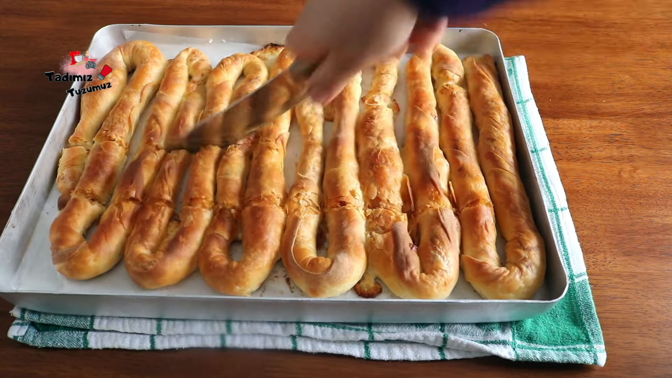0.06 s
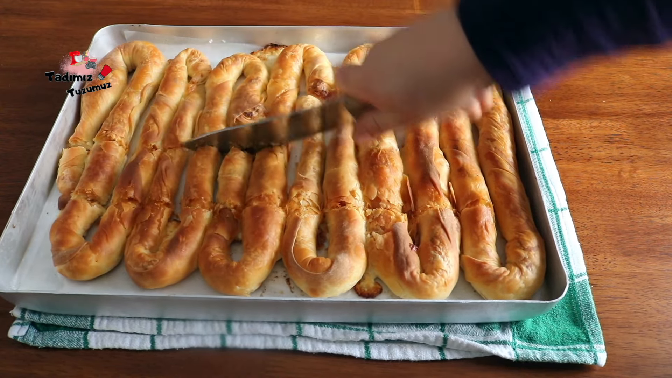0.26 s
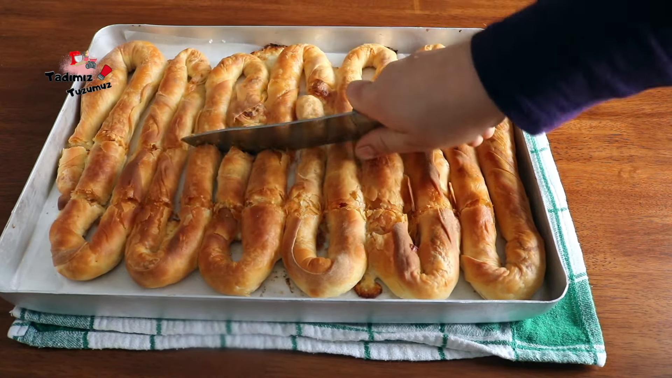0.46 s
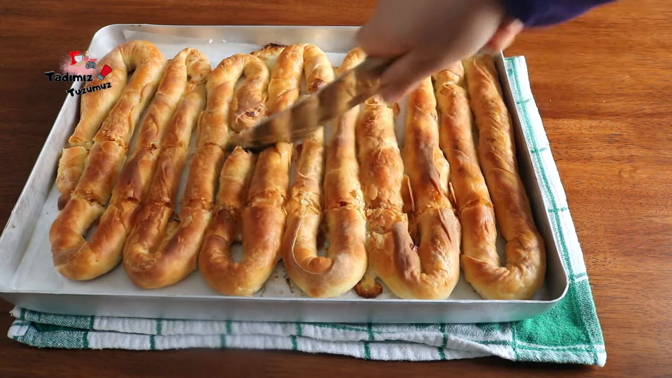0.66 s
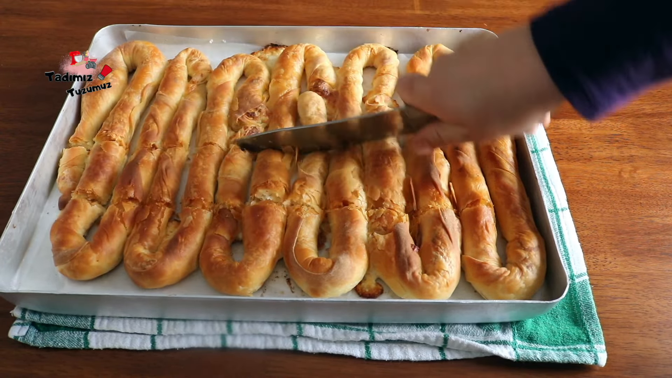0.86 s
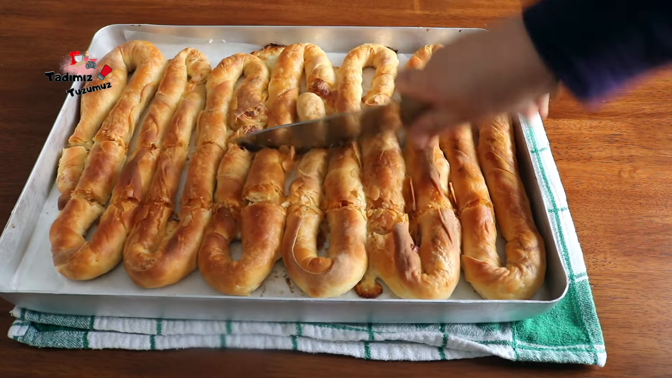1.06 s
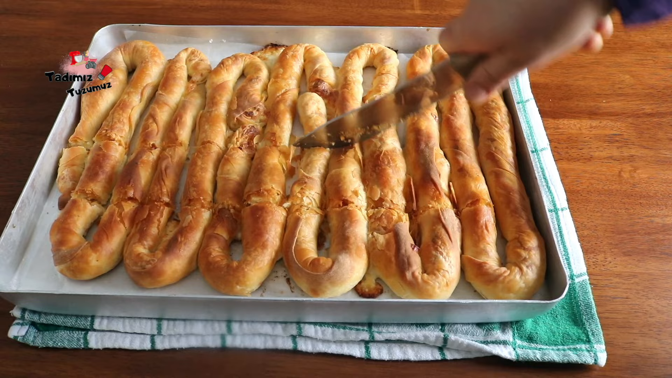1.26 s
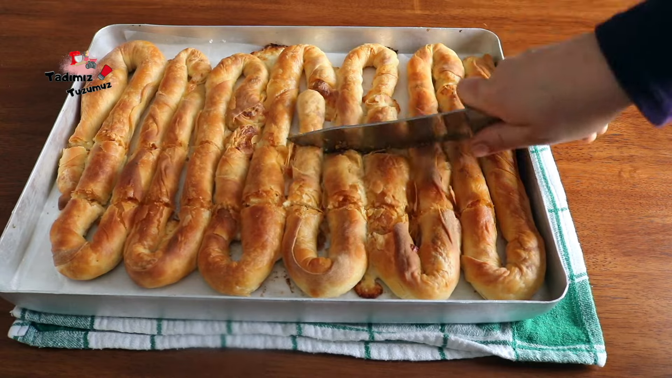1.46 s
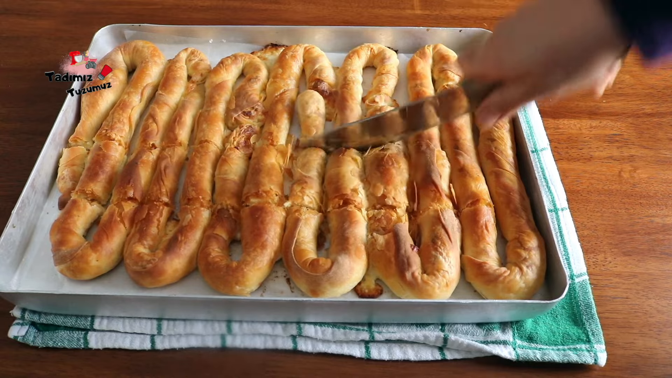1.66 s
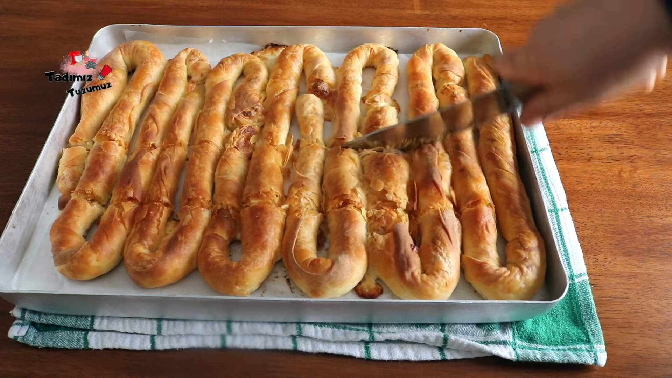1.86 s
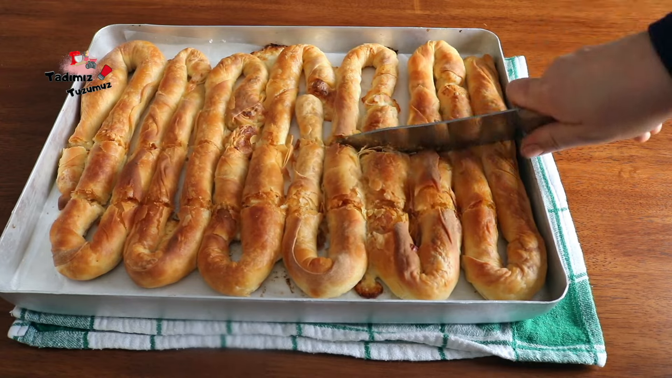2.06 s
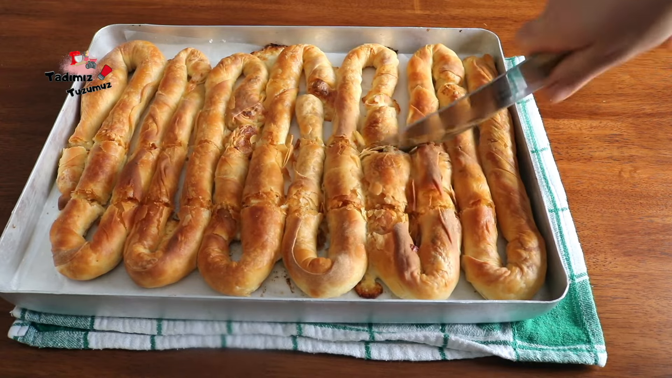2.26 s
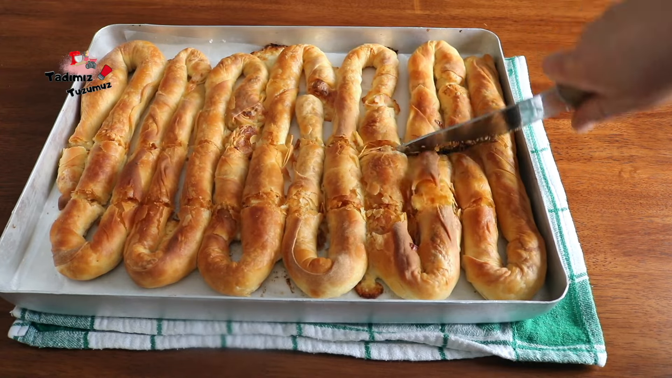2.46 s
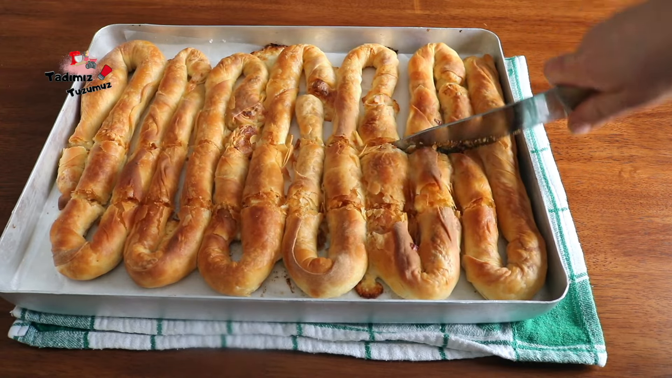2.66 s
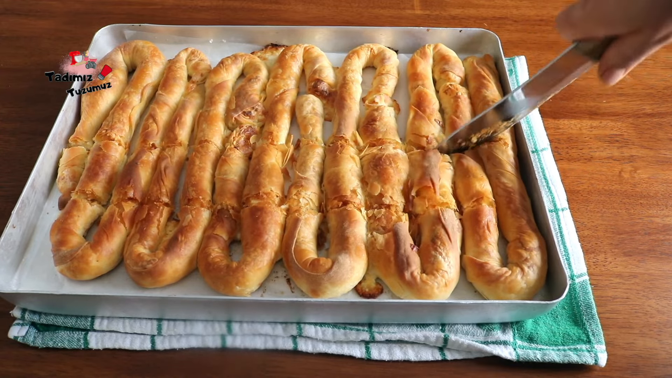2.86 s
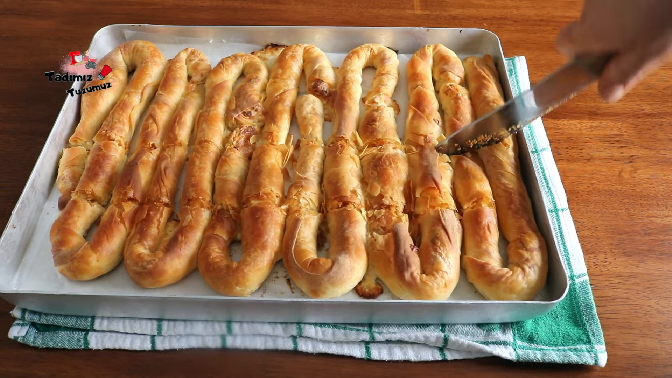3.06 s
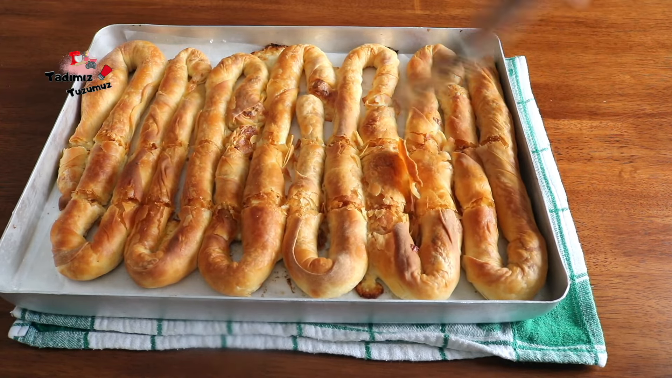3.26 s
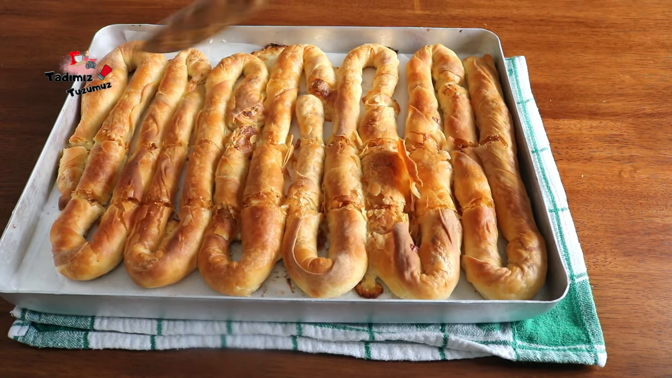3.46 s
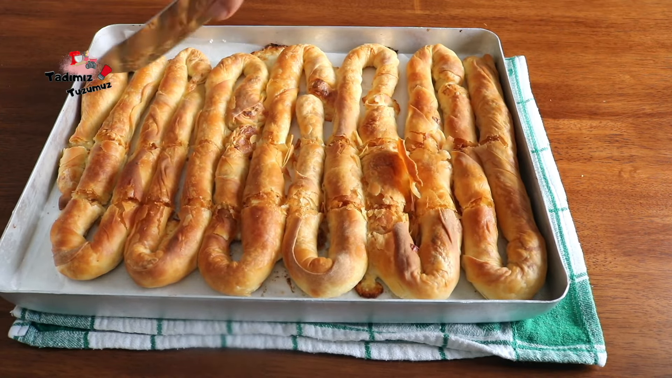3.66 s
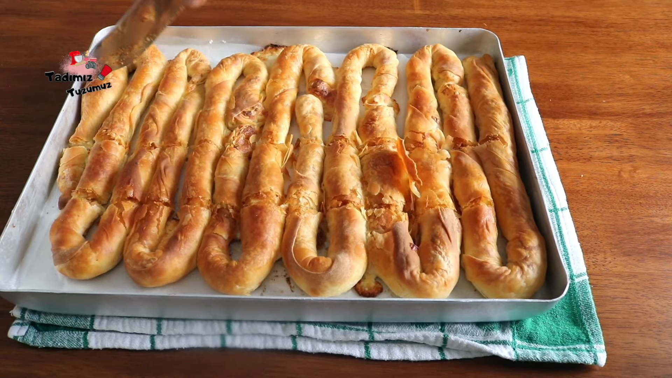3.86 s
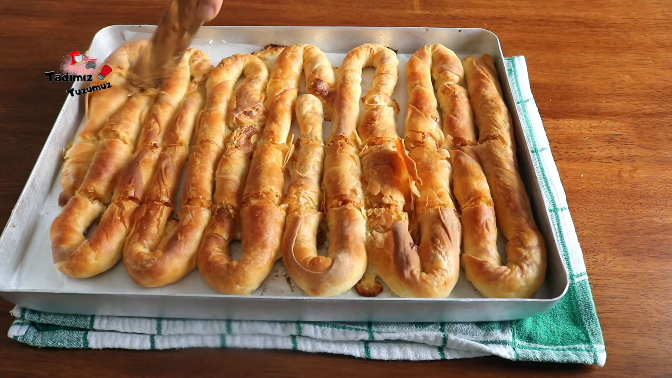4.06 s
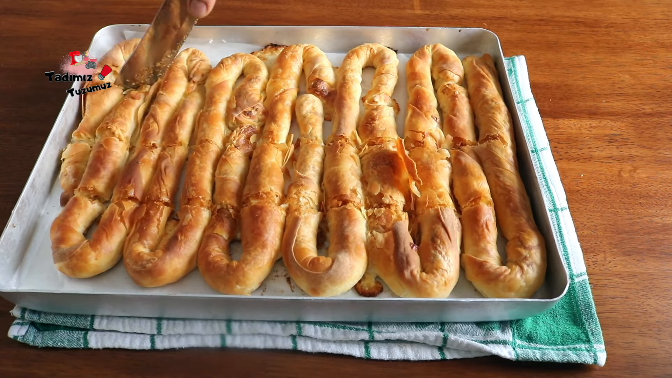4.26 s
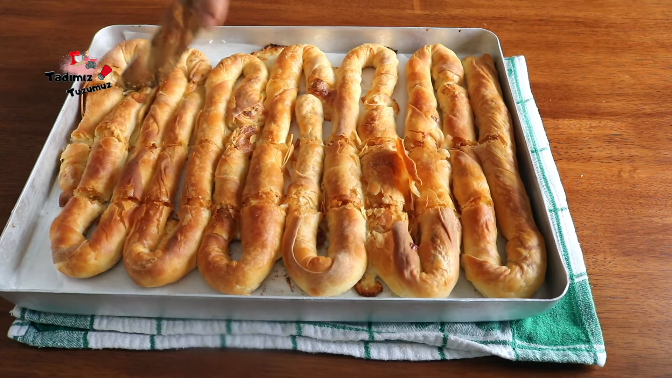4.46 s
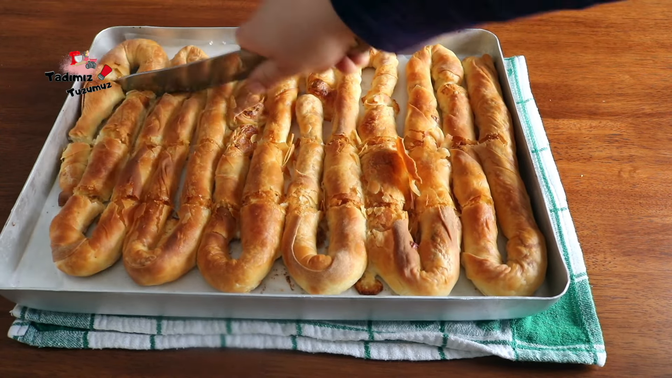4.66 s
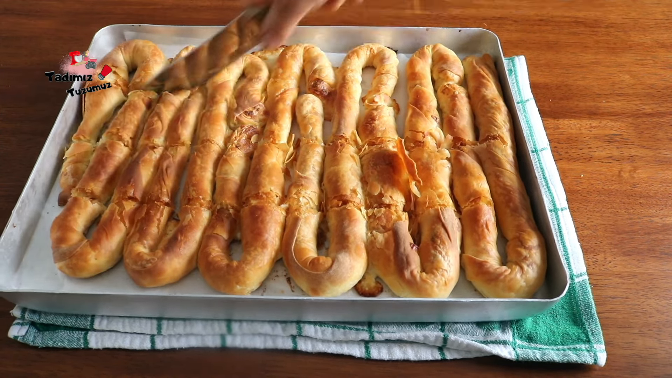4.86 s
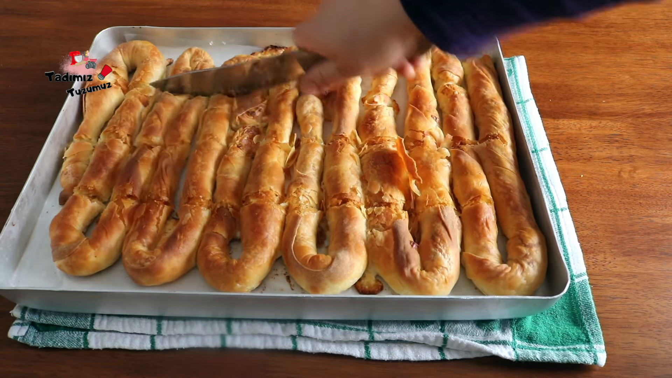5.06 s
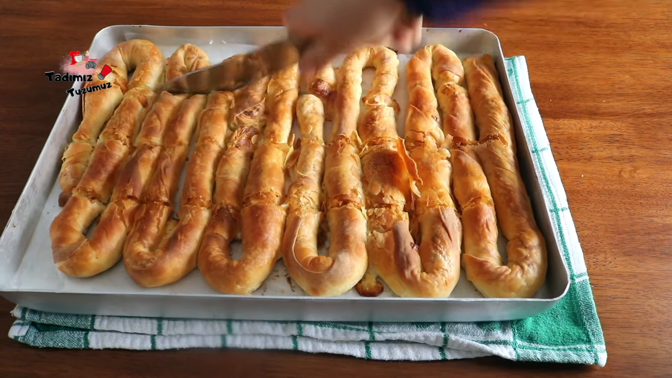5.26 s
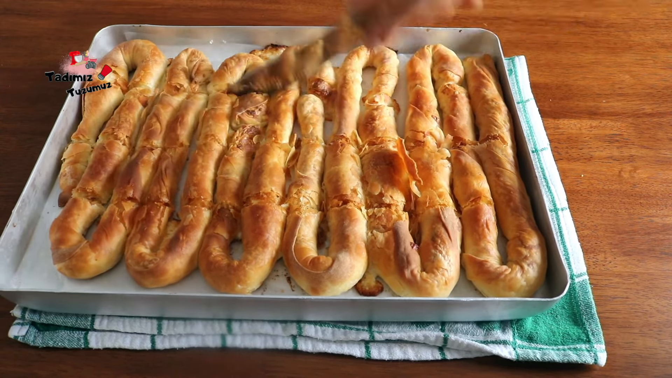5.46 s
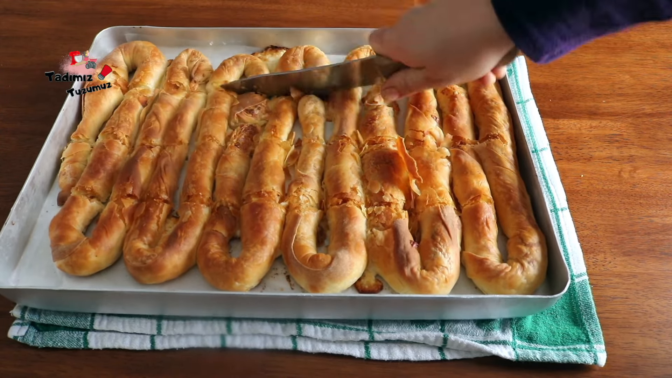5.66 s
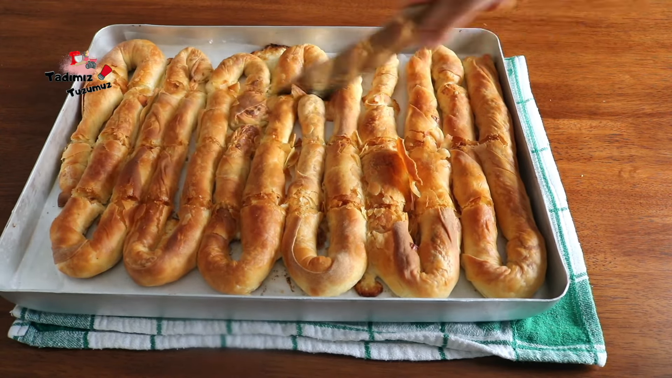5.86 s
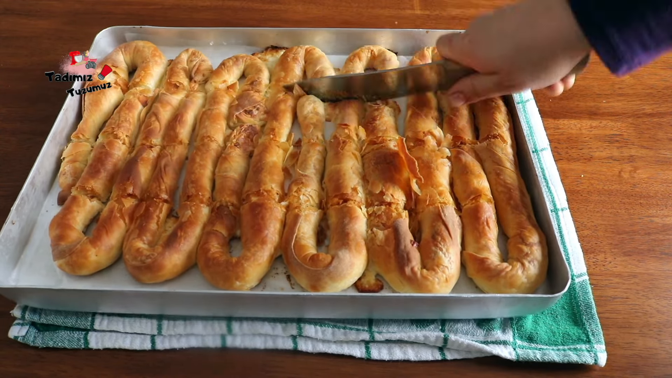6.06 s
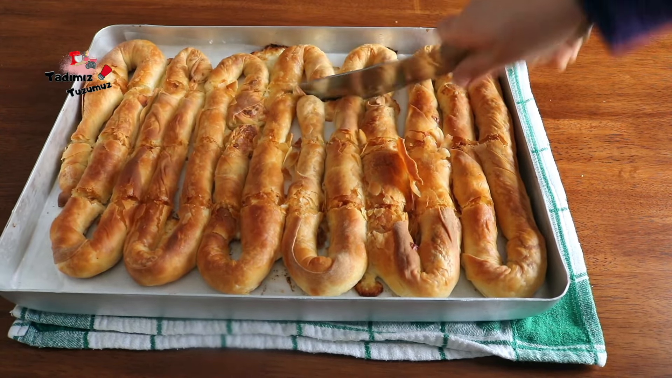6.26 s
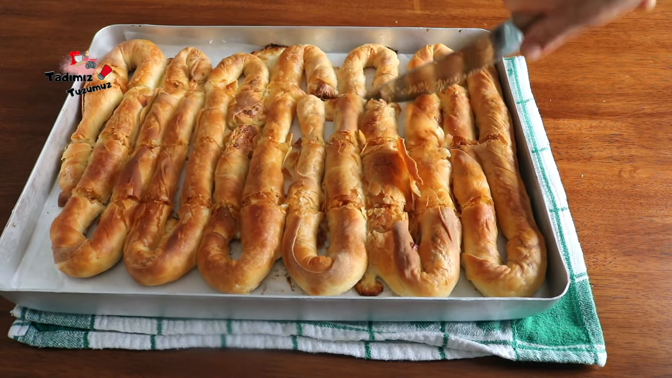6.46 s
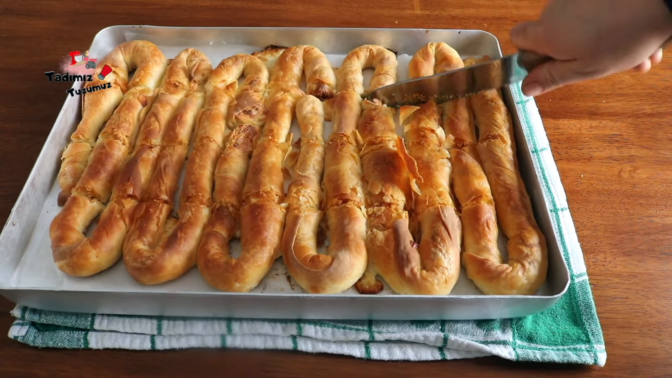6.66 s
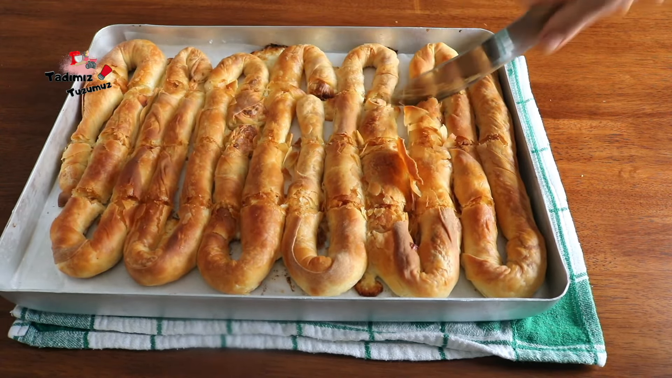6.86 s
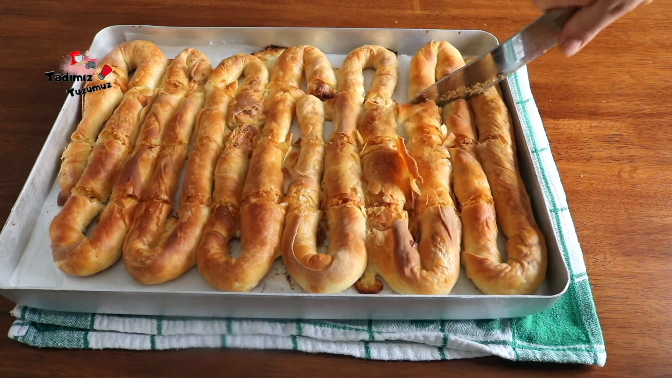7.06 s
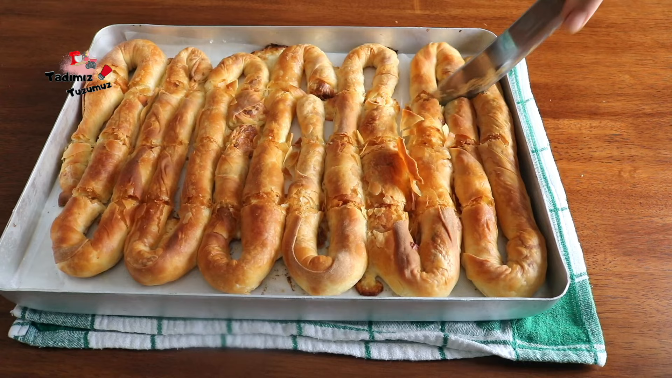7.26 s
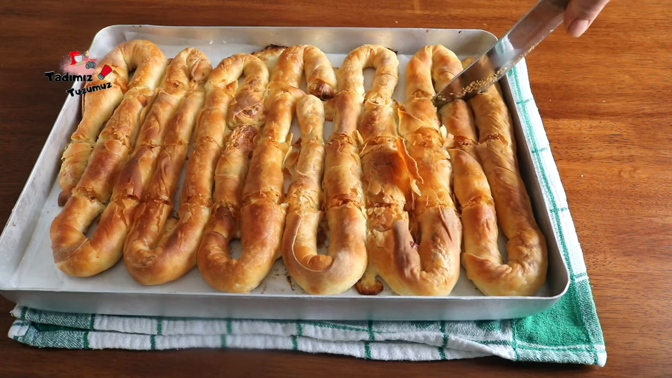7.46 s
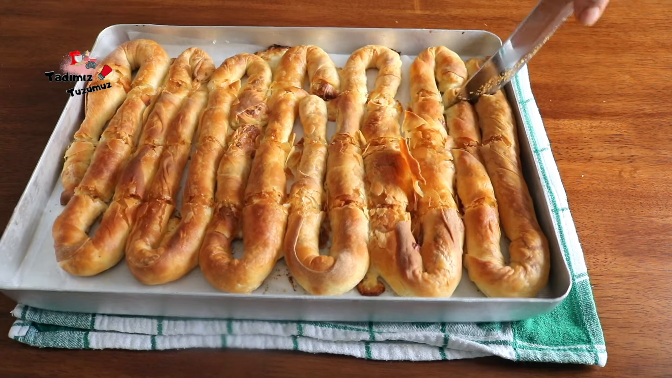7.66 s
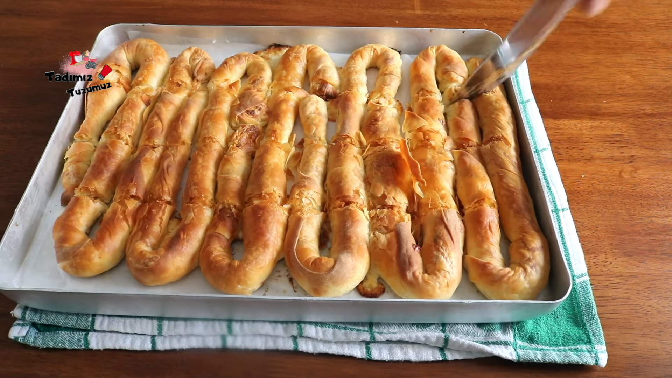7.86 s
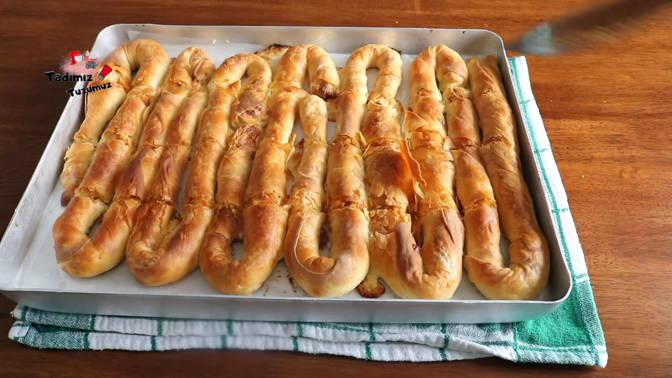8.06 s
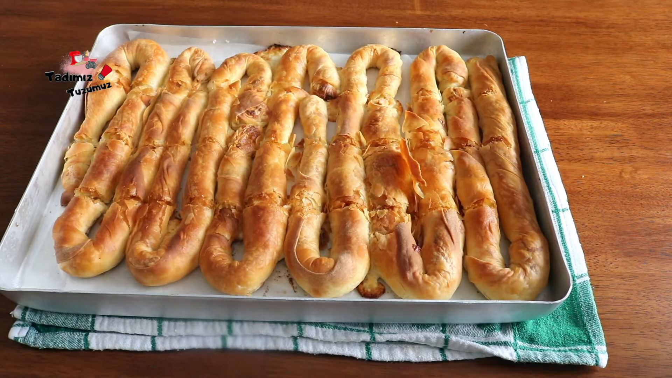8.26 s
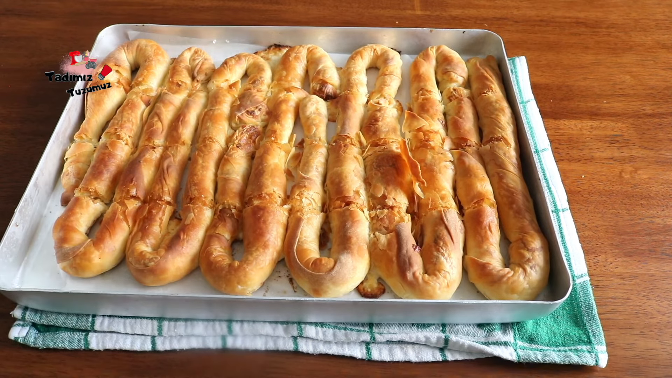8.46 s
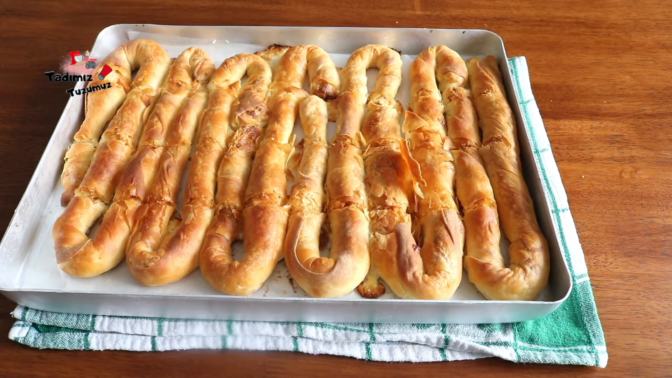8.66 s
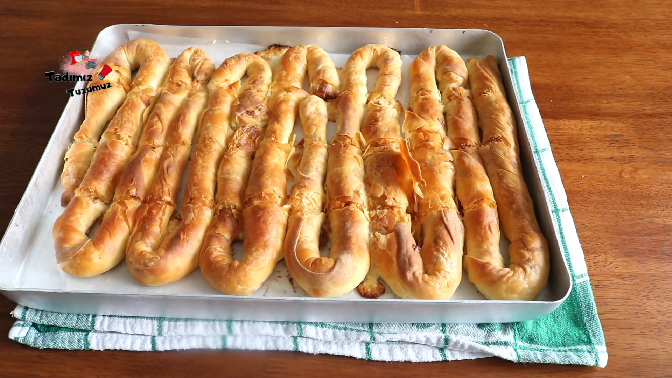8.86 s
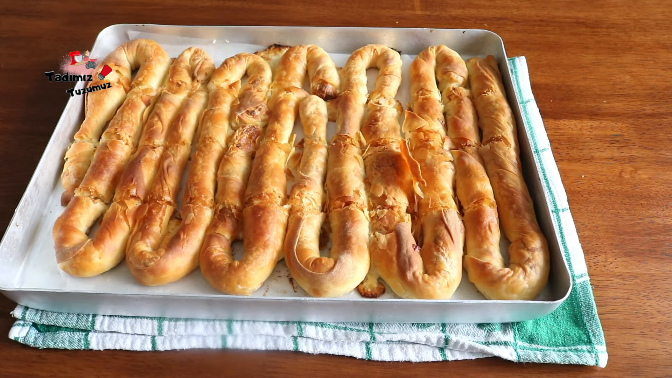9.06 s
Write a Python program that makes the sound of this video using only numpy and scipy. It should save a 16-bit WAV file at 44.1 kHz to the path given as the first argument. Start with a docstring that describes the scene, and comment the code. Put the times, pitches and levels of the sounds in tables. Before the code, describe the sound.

A knife cuts crisp pastry on a metal tray resting on a towel, heard very close in a small kitchen with short, bright reverberation. From 0 to 0.8 s there are light crackles, rustling and a rubbing scrape. Stronger crunches and sharp snaps begin near 0.85 s and cluster around 1.35-1.5, 1.9-2.1, 2.4 and 2.9 s, joined by dull, briefly ringing tray knocks. From about 3.2 s it thins to faint scrapes and a small tap. The second pass bites in at 4.0 s, squeaks clearly around 4.65 s, then crackles in dense irregular bursts at 5.0-5.2, 5.5, 5.9-6.2 and 6.5 s. A hard tray knock lands near 7.1 s, followed by short scrapes, ticks and knocks until 7.9 s. A weak last touch around 8.2 s leaves only quiet room hush.

```python
"""In a small kitchen a knife saws twice across a metal tray of crisp baked pastry, close to the microphone.
Brittle fracture: each bite crushes a swarm of tiny flakes as decaying clicks, with a few loud snaps.
Friction: slips of the blade excite short resonances as squeaks, and its flat hisses along the cut.
Impact: the blade knocks through to the tray, which rests on a towel and rings in damped modes.
Dense decaying noise reflections form the reverberation, over faint steady room noise."""
import sys
import numpy as np
from scipy import signal
from scipy.fft import rfft, irfft, next_fast_len
from scipy.io import wavfile
from scipy.ndimage import uniform_filter1d

SR = 44100
rng = np.random.default_rng(int(sys.argv[2]) if len(sys.argv) > 2 else 0)


def bounce(signal):
    """Save signal as a 16-bit WAV file at the path given by the first command-line argument."""
    frames = np.transpose(np.atleast_2d(signal))
    limited = np.clip(frames, -1, 1)
    pcm = np.round(limited * 32767).astype(np.int16)
    wavfile.write(sys.argv[1], SR, pcm)


N = 401310  # samples


def gain_of(db):
    """Logarithmic level: converts decibels to amplitude."""
    return 10 ** (np.asarray(db) / 20)


def evened(x):
    """Normalisation: scales a signal to rms 1."""
    return x / np.sqrt(np.mean(x ** 2) + 1e-20)


def read(points, hz, axis=1):
    """Interpolation along log frequency of one column of a table."""
    columns = np.transpose(points)
    return np.interp(np.log(hz + 1), np.log(columns[0] + 1), columns[axis])


def add(mix, s, sound):
    """Superposition: adds a sound to the mix at time s."""
    part = mix[max(round(s * SR), 0):][:len(sound)]
    part += sound[:len(part)]


def filtered(x, response):
    """Linear filtering: multiplies the spectrum by a response given as a function of Hz."""
    size = next_fast_len(x.shape[-1] + SR // 20)
    spectrum = rfft(x, size) * response(np.fft.rfftfreq(size, 1 / SR))
    return irfft(spectrum, size)[..., :x.shape[-1]]


def steadied(x, span_s):
    """Power levelling: evens out stretches of about span_s and keeps the finer grain."""
    size = max(int(span_s * SR), 2)
    power = uniform_filter1d(uniform_filter1d(x ** 2, size), size)
    return x / np.sqrt(abs(power) + 1e-9)


def ping(hz, cycles, t):
    """Damped oscillation: a sine that falls to 1/e in the given number of cycles."""
    return np.sin(2 * np.pi * hz * t) * np.exp(-hz * t / cycles)


def hump(f, hz, octaves):
    """Broad resonance: a smooth peak around hz on a log frequency axis."""
    return (1 + (np.log2((f + 1) / hz) / octaves) ** 2) ** -2


def patchy(x, depth_db, frames, bins):
    """Local resonance: smooth random gains over time and frequency, as the blade moves over the crust."""
    z = signal.stft(x, SR, nperseg=256)[2]
    patches = rng.standard_normal(z.shape)
    for axis, size in [(0, bins), (1, frames)] * 2:
        patches = uniform_filter1d(patches, max(round(size), 1), axis)
    return signal.istft(z * gain_of(depth_db * evened(patches)), SR)[1][:N]


# Spectrum of the still air of the room. Each row: frequency in Hz, relative density in dB per Hz.
AIR_SPECTRUM = [(18, -71), (30, -52), (118, -15), (134, -2.5), (174, -9), (210, -1.5), (252, -8), (384, -2),
                (415, -8.5), (554, -10.5), (1590, -16.5), (5740, -23), (16000, -40.5)]
HUSH_DB = -57.5  # rms level ahead of the microphone


def hush(apart):
    """Stationary noise: faint room noise, mostly shared by both sides; apart is the unshared amplitude."""
    noise = rng.standard_normal(N) + apart * rng.standard_normal((2, N))
    return gain_of(HUSH_DB) * evened(filtered(noise, lambda f: gain_of(read(AIR_SPECTRUM, f))))


def reflections(x, fade_db):
    """Diffuse reflection: dense echoes, different at each ear; fade_db(Hz, s) is their decay."""
    hz, t, z = signal.stft(rng.standard_normal((2, SR)), SR, nperseg=256)
    fade = gain_of(fade_db(hz[:, None], t))
    fade = fade / np.sqrt(np.mean(fade ** 2, axis=-1, keepdims=True))  # each band at energy 1
    tail = signal.istft(z * fade, SR)[1] / np.sqrt(SR)
    return signal.fftconvolve(x[None], tail, axes=1)[:, :N]


# Reverberation time of the kitchen. Each row: frequency in Hz, time to fall by 60 dB in seconds.
ROOM_DECAY = [(150, 0.13), (400, 0.23), (1000, 0.49), (2800, 0.3), (7000, 0.41), (15000, 0.13)]
# Strength of the reverberation. Each row: frequency in Hz, gain in dB.
ROOM_GAIN = [(150, -19.5), (500, -7.5), (1500, -9.5), (4000, -16), (8000, -19), (15000, -27.5)]


def kitchen(x):
    """Reverberant decay: the walls answer, weaker at the very start; each frequency dies at its own rate."""
    tail = reflections(x, lambda f, t: -60 * t / read(ROOM_DECAY, f) - 20 * np.exp(-t / 0.00062))
    return filtered(tail, lambda f: gain_of(read(ROOM_GAIN, f)))


# Modes of the loaded tray. Each row: frequency in Hz, relative level in dB, time to fall by 60 dB in seconds.
TRAY_MODES = [(128.3, 11, 0.64), (158, 10.5, 0.57), (189.4, 2.5, 0.85), (210.4, 7.5, 0.47),
              (245.6, 2.5, 0.45), (273, 3.5, 0.62), (320, 0, 0.61), (352.7, 13.5, 0.065), (401, 7.5, 0.38),
              (439.8, 7, 0.35), (675, 4, 0.37), (824, -1.5, .25), (950, -5.5, 0.22)]
# The blade meets the tray. Each row: start in seconds, relative level in dB, pitch of the knock in Hz,
# pitch of the boom in Hz, relative level of the boom in dB.
TRAY_KNOCKS = [(.368, -31.5, 675, 200, -14.5), (.859, -43.5, 1380, 190, -27), (1.372, -23, 673, 175, -17),
               (1.41, -21, 750, 205, -15), (1.507, -23.5, 781, 215, -5), (2.039, -20.5, 710, 298, -5),
               (2.077, -28.5, 872, 260, -0.5), (2.538, -25, 1080, 303, -10), (2.754, -32, 880, 393, -23),
               (2.937, -19, 1400, 170, -14.5), (2.945, -15.5, 1160, 300, -6), (3.284, -28, 760, 368, -12.5),
               (3.828, -26.5, 1058, 435, -16), (4.218, -29, 565, 280, -9.5), (4.567, -26.5, 473, 400, -4.5),
               (5.067, -22, 418, 420, -8), (5.119, -16, 1080, 344, -8), (5.519, -28.5, 610, 400, -31),
               (6.022, -18, 1050, 401, -25.5), (6.294, -23.5, 890, 404, -29),
               (6.493, -16.5, 1250, 400, -31), (6.619, -31, 573, 432, -14.5), (7.077, -9, 1200, 460, -14),
               (7.086, -16, 980, 260, -5.5), (7.399, -19.5, 1050, 260, -9), (7.633, -23, 845, 255, -7),
               (8.157, -35, 636, 300, -7)]
KNOCK_OCTAVES, HARDNESS = 0.84, 1  # spread of a knock at 1 kHz; harder contact is both higher and broader


def knocks(blow_db, blow_s, ring_db, boom_octaves, clatter_db, clatter_s, clatter_hz):
    """Modal excitation: a dull blow, cushioned by dough, makes the tray boom in low modes and clatter."""
    t, out = np.arange(SR // 2) / SR, np.zeros(N)
    mode_hz, mode_db, t60 = np.transpose(TRAY_MODES)[..., None]
    for s, db, hz, boom_hz, boom_db in TRAY_KNOCKS:
        octaves = KNOCK_OCTAVES * (hz / 1000) ** HARDNESS
        noise = evened(filtered(rng.standard_normal(len(t)), lambda f: hump(f, hz, octaves)))
        blow = steadied(noise, span_s=0.00086) * np.exp(-t / blow_s)
        # shaped noise stands for the many higher modes
        spread = lambda f: hump(f, 2 * boom_hz, octaves=1.75) / (1 + (f / clatter_hz) ** 4)
        clatter = evened(filtered(rng.standard_normal(len(t)), spread))
        clatter = clatter * np.exp(-(t / clatter_s) ** 2.5)
        phase, load = rng.uniform(-1.007, 1, (2, len(TRAY_MODES), 1))
        detuned_hz = mode_hz * (1 + 0.0475 * load)  # the pressing knife detunes the tray a little
        modes = gain_of(mode_db - 60 * t / t60) * np.sin(2 * np.pi * detuned_hz * t + np.pi * phase)
        boom = (hump(mode_hz, boom_hz, boom_octaves) * modes).sum(0)  # the place struck picks the modes
        onset = 1 - np.exp(-t / 0.0037)
        ring = (gain_of(ring_db) * boom + gain_of(clatter_db) * clatter) * onset
        add(out, s, gain_of(db) * (gain_of(blow_db) * blow + gain_of(boom_db) * ring))
    return out


def tray():
    """Impact sound: the blade knocks on the tray."""
    return knocks(blow_db=0.0, blow_s=0.0088, ring_db=-9.5, boom_octaves=0.61,
                  clatter_db=-11.0, clatter_s=0.13, clatter_hz=2800)


# The flat of the blade slides along the cut, and is lifted between the two passes.
# Each row: time in seconds, relative level in dB.
SLIDE_LEVEL = [(0, -48), (.7, -46), (1.15, -48), (1.8, -50), (2.199, -45.5), (3.2, -49.5), (3.45, -56.5),
               (4.498, -53.5), (5.1, -46.5), (6.1, -46.5), (7.6, -44.5), (7.8, -51.5), (8.5, -59)]
# Rustle of that sliding. Each row: frequency in Hz, relative density in dB per Hz.
RUSTLE_SPECTRUM = [(290, -10), (500, -5.5), (1930, -5.5), (3060, -4), (10400, -17.5), (13100, -27.5),
                   (15100, -30), (16000, -22.5)]
CRUMBS_PER_S, CRUMB_DB = 45, 18  # crumbs tick under the blade; size relative to the unfiltered hiss


def slide():
    """Sliding friction: steel glides over soft dough with an uneven hiss and crushes stray crumbs."""
    s, db = np.transpose(SLIDE_LEVEL)
    crumbs = gain_of(CRUMB_DB) * rng.standard_normal(N) * (rng.random(N) < CRUMBS_PER_S / SR)
    hiss = patchy(rng.standard_normal(N) + crumbs, depth_db=3.0, frames=15, bins=3)
    level = gain_of(np.interp(np.arange(N) / SR, s, db, right=-90))
    return level * evened(filtered(hiss, lambda f: gain_of(read(RUSTLE_SPECTRUM, f))))


# The blade rubs and squeaks in the cut. Each row: start in seconds, relative level in dB, pitch in Hz,
# width in Hz before division by the sharpness, rise in seconds.
BLADE_RUBS = [(0.014, -39.5, 2550, 700, 0.02), (.279, -30.5, 3050, 910, 0.035),
              (0.479, -40.5, 3280, 500, 0.0017), (.91, -36.5, 1000, 700, 0.064),
              (1.131, -38.5, 1145, 176.4, 0.0063), (1.126, -43.5, 2570, 470, 0.0067),
              (1.126, -46, 4890, 400, 0.0071), (1.598, -38, 7600, 1500, 0.00086),
              (2.169, -35.5, 3780, 900, 0.004), (2.409, -29, 2400, 1145, 0.031),
              (2.97, -39.5, 3080, 600, 0.054), (3.13, -34.5, 3360, 1200, 0.036),
              (3.135, -37, 2100, 300, 0.034), (3.693, -35, 3420, 700, 0.0022),
              (4.631, -24, 1610, 500, 0.004), (4.664, -21, 2340, 1000, 0.011),
              (4.81, -33, 1340, 505, 0.0086), (5.228, -46, 5400, 600, .005),
              (6.115, -26, 2750, 887, 0.0017), (6.19, -29, 2100, 850, .018),
              (6.293, -35, 3330, 500, 0.0074), (6.845, -27.5, 6370, 1200, 0.038),
              (7.038, -43.5, 3060, 700, 0.0041), (7.234, -38, 4260, 396, 0.0036),
              (7.379, -28.5, 4930, 2410, 0.0032), (7.527, -27, 1130, 507, 0.005),
              (7.527, -41.5, 3620, 1800, 0.0086), (7.622, -27.5, 3180, 900, 0.00082),
              (7.697, -26.5, 2450, 1410, 0.007), (7.874, -25.5, 2840, 570, 0.00089),
              (7.874, -34, 5300, 1010, 0.0052), (8.231, -45.5, 3600, 200, 0.0023)]
RUB_FALL_S = 0.019  # a squeak dies once the blade stops


def rubs(slips_per_s, hiss, sharpness):
    """Stick-slip friction: irregular slips of steel on crust excite a short-lived resonance."""
    t, out = np.arange(SR // 5) / SR, np.zeros(N)
    for s, db, hz, width, rise in BLADE_RUBS:
        slips = rng.standard_normal(len(t)) * (hiss + (rng.random(len(t)) < slips_per_s / SR))
        tone = evened(filtered(slips, lambda f: 1 / (1 + (sharpness * (f - hz) / width) ** 2)))
        swell = np.minimum(t / rise, 1) * np.exp(-np.maximum(t - rise, 0) / RUB_FALL_S)
        add(out, s, gain_of(db) * steadied(tone, span_s=0.027) * swell)
    return out


def swarm(per_s, spread_db, slips_per_s, slip_gain, slip_s, cycles, count=18):
    """Brittle fracture: tiny cracks of many sizes and pitches, in dying avalanches set off by blade slips."""
    t, out = np.arange(SR // 100) / SR, np.zeros(N)
    slips = rng.exponential(1, N) * (rng.random(N) < slips_per_s / SR)
    decay = np.exp(-1 / (slip_s * SR))
    avalanche = 1 + slip_gain * signal.lfilter([1], [1, -decay], slips)
    for hz in np.geomspace(700, 15000, count):
        place, size, sign = rng.random((int(per_s * N / SR / count), 3)).T
        clicks = np.zeros(N)
        strength = gain_of(spread_db * np.minimum(-np.log(1 - size), 4))
        clicks[(place * N).astype(int)] = strength * np.sign(sign - .5)
        out += signal.oaconvolve(clicks * avalanche, hz * ping(hz, cycles, t))[:N]
    # flatten the average spectrum
    hz, power = signal.welch(out, SR, nperseg=256)
    return evened(filtered(out, lambda f: np.interp(f, hz, power) ** -.5))


BITE_FROM_DB, SAG_DB_PER_S, RELEASE_DB_PER_S = -20, 15, 426.5  # start of the build-up, easing, letting go


def pressure(rise, hold):
    """Load and yield: the force of one bite builds, sags while the crust gives way, and is released."""
    t = np.arange(0, rise + hold + .2, 1 / SR)
    build_db = BITE_FROM_DB * np.maximum(1 - t / rise, 0)
    sag_db = SAG_DB_PER_S * np.clip(t - rise, 0, hold)
    release_db = RELEASE_DB_PER_S * np.maximum(t - rise - hold, 0)
    return gain_of(build_db - sag_db - release_db)


# Spectrum of the crunch. Each row: frequency in Hz, relative density in dB per Hz.
CRUNCH_SPECTRUM = [(35, -52.5), (60, -23), (180, -8.5), (553, -9), (621, -3), (682, -5), (2090, -7.5),
                   (2300, -7), (2970, -1.5), (5590, -6.5), (7750, -6), (14200, -12), (16000, -16)]
# Bands of the deep layers, the crust and the fine flakes. Each row: lower edge in Hz, upper edge in Hz.
LAYER_BANDS = [(110, 2000), (2000, 7500), (7500, 20000)]
# The blade bites into the crust. Each row: start in seconds, build-up in seconds, hold in seconds,
# relative level of the crust in dB, deep layers in dB relative to it, fine flakes in dB relative to it.
CRUST_BITES = [ (0.0, 0.067, 0.0078, -33.5, -14.5, 1), (0.219, 0.081, 0.1, -34, -12, 7),
               (0.555, 0.059, 0.097, -46.5, -10.5, 2), (0.808, .002, 0.045, -37, -7.5, 11),
               (0.849, 0.006, 0.009, -20.5, -10, -2.5), (0.892, 0.0073, 0.055, -32.5, -1, -2.5),
               (1.327, 0.016, 0.08, -28, -0.5, -3.5), (1.446, 0.013, 0.05, -34, -5.5, 0),
               (1.667, 0.0044, 0.031, -53, -8, 3.5), (1.854, 0.0037, 0.13, -28, -11.5, -6),
               (2.038, 0.0047, 0.062, -29, 0.5, -9), (2.391, .036, 0.02, -25, -14.5, -7.5),
               (2.543, 0.0066, 0.025, -40.5, 6, 4), (2.7, 0.0072, 0.065, -49.5, 0, -0.5),
               (2.903, 0.026, 0.0074, -33.5, 5, -11.5), (3.127, 0.017, .055, -46.5, 5.5, 5.5),
               (3.818, .002, 0.0097, -38.5, 6.5, -0.5), (4.018, 0.0019, 0.13, -23.5, -8.5, -5.5),
               (4.167, 0.031, 0.064, -34, -13, -11), (4.53, .04, 0.12, -26.5, -6, -3),
               (4.701, 0.011, .03, -35.5, -5.5, -17), (4.76, 0.0059, 0.095, -32.5, -13.5, -4),
               (4.971, 0.0088, 0.039, -29, -15.5, -5.5), (5.053, 0.027, 0.058, -27, -11.5, -6.5),
               (5.194, 0.0068, 0.022, -51.5, 2.5, 1), (5.477, 0.032, 0.063, -25.5, -5.5, -5),
               (5.606, 0.033, 0.0074, -36, 0.5, 5.5), (5.723, 0.0026, 0.0068, -35.5, -8.5, -6),
               (5.909, 0.016, 0.058, -33, -14, 9), (5.966, 0.053, 0.011, -25.5, -5, 0.5),
               (6.113, 0.0016, 0.0058, -28.5, -11, -4.5), (6.166, .036, 0.0039, -24.5, -21.5, -38),
               (6.434, 0.0023, 0.028, -37.5, -16.5, -1.5), (6.487, 0.032, 0.017, -24.5, -9, -2),
               (6.563, 0.0059, 0.03, -31, -28, -12), (6.812, 0.0017, 0.083, -35, -23, -0.5),
               (6.991, 0.019, 0.047, -43, -6.5, -7), (7.215, 0.012, .03, -48, 5, -8),
               (7.336, 0.0015, 0.02, -41.5, -37, -9), (7.375, 0.011, .025, -40.5, -6, 4),
               (7.524, .008, 0.014, -46, 8, 4.5), (7.599, 0.019, 0.0062, -31.5, -6, -2.5),
               (7.702, 0.0054, 0.004, -44, 0, -17), (7.88, 0.0019, 0.016, -40.5, -19, -6)]


def crunch(grains):
    """Layered fracture: deep layers, crust and fine flakes break together under each bite."""
    out = np.zeros(N)
    for layer, (low_hz, high_hz) in enumerate(LAYER_BANDS):
        band = lambda f: ((1 + (low_hz / (f + 1)) ** 8) * (1 + (f / high_hz) ** 8)) ** -.5
        layer_grains = filtered(grains, lambda f: band(f) * gain_of(read(CRUNCH_SPECTRUM, f)))
        sound = steadied(evened(layer_grains), span_s=0.032)
        force = np.zeros(N)
        for s, rise, hold, crust_db, deep_db, fine_db in CRUST_BITES:
            layer_db = crust_db + [deep_db, 0, fine_db][layer]
            add(force, s, gain_of(layer_db) * pressure(rise, hold))
        out += sound * force
    return out


FLAKES_PER_S, FLAKE_DB, FLAKE_SPREAD_DB = 19, 7.5, 6.5  # rate in a bite; level offset from the crust column
FLAKE_HZ, FLAKE_OCTAVES = 5400, 0.67  # their pitch, and its range either way
SKIN_DB = 10  # first crack as the edge breaks the skin, offset from the crust column


def flakes():
    """Random failure: the skin cracks as each bite takes hold, then lesser flakes snap at random."""
    rows = []  # as the rows of the large flakes
    for (s, rise, hold, crust_db, _, _), draws in zip(CRUST_BITES, rng.random((len(CRUST_BITES), 12, 3))):
        wait, size, pitch = draws.T
        after = np.cumsum(-np.log(1 - wait)) / FLAKES_PER_S
        db = crust_db + FLAKE_DB + FLAKE_SPREAD_DB * (2 * size - 1) - SAG_DB_PER_S * after
        hz = FLAKE_HZ * 2 ** (FLAKE_OCTAVES * (2 * pitch - 1))
        rows.append((s + rise, crust_db + SKIN_DB, hz[-1]))
        rows += [row for row in zip(s + rise + after, db, hz) if row[0] < s + rise + hold]
    return rows


# The largest flakes snap singly. Each row: start in seconds, relative peak level in dB, pitch in Hz.
LARGE_FLAKES = [(0.3416, -12.5, 3500), (0.376, -11.5, 3220), (0.425, -13, 5130), (0.811, -5.5, 7780),
                (.854, -8.5, 2860), (.862, -4.5, 2900), (0.9231, -11, 2470), (0.9618, -13, 5370),
                (1.3527, -3, 2920), (1.3705, -6.5, 3200), (1.412, 2.5, 5900), (1.4822, -9, 6500),
                (1.563, -17.5, 6500), (1.599, -26, 7400), (1.8779, -28, 7900), (1.9244, -7, 4420),
                (2.136, -6.5, 3900), (2.4368, -7.5, 3220), (2.589, -13.5, 4540), (2.946, -2, 3030),
                (4.2258, -6.5, 5900), (4.2982, -15.5, 8900), (4.8345, -10.5, 3870), (4.985, -11, 7400),
                (5.1233, -5, 2760), (5.5064, -1, 7760), (5.529, -5.5, 3260), (5.5555, -1.5, 7200),
                (5.649, -33, 4980), (5.944, -5, 7600), (5.9904, -9, 3350), (6.0398, -4.5, 7040),
                (6.118, -15, 2700), (6.5216, 0, 4480), (6.6028, -6, 4380), (6.87, -14, 6900),
                (6.892, -11.5, 4860), (7.3382, -18.5, 7150), (7.6228, -3.5, 3030)]


def snaps(cycles, shatter_db, shatter_s):
    """Impulsive fracture: a flake breaks with one sharp click and a spray of splinters of like pitch."""
    t, out = np.arange(SR // 50) / SR, np.zeros(N)
    for s, db, hz in LARGE_FLAKES + flakes():
        splinters = filtered(rng.standard_normal(len(t)), lambda f: hump(f, hz, octaves=0.99))
        spray = gain_of(shatter_db) * evened(splinters) * np.exp(-t / shatter_s)
        click = ping(hz, cycles, t) * rng.choice([-1, 1])
        add(out, s, gain_of(db) * (click / abs(click).max() + spray))
    return out


def pastry():
    """Fracture and friction together: crunch, snaps, squeaks and sliding of the blade in the crust."""
    grains = swarm(per_s=11000, spread_db=4.5, slips_per_s=90, slip_gain=0.96, slip_s=0.0053, cycles=1.18)
    crackle = crunch(patchy(grains, depth_db=3.5, frames=6, bins=3))
    clicks = snaps(cycles=2.5, shatter_db=-6.5, shatter_s=0.002)
    squeaks = rubs(slips_per_s=640, hiss=0.073, sharpness=1.73)
    broken = gain_of(-1.59) * crackle + gain_of(-5.5) * clicks
    return broken + gain_of(3.5) * squeaks + gain_of(-3) * slide()


# How much the two sides differ. Each row: frequency in Hz, side level in dB relative to the middle.
SIDE_LEVEL = [(100, -25), (250, -24), (600, -11), (2500, -7), (8000, -6), (15000, -8.5)]


def scene():
    """Directional radiation: crust and tray differ to each side, and excite the room to different degrees."""
    crust, metal = pastry(), tray()
    # a second, independent draw of the same sources makes the difference between the sides
    side = filtered(pastry() + tray(), lambda f: gain_of(read(SIDE_LEVEL, f)))
    # off the rim and the table
    scatter = gain_of(-36.5) * reflections(crust + metal, lambda f, t: -60 * t / 0.27)
    room = kitchen(crust + gain_of(-1.0) * metal)
    return crust + metal + np.array([side, -side]) + scatter + room + hush(apart=0.82)


# Every sound comes twice, a weaker copy first.
# Each row: frequency in Hz, relative level of the copy in dB, its phase lag in radians.
EARLY_COPY = [(192, -29.5, 3.07), (685, -8, 2.8), (1477, -7.5, 2.3), (3870, -6.5, 1), (7480, -7, 0.48),
              (13740, -4.5, 0.39)]
COPY_LEAD_S, EDGE_HZ = .008912, 15950  # lead of the copy; upper band limit


def record(dry):
    """Comb interference: bass is shed, a weaker copy runs 9 ms ahead, peaks round off, the band is limited."""
    thinned = signal.sosfilt(signal.butter(2, 85, "highpass", fs=SR, output="sos"), dry)

    def copy(f):
        """Phase advance: the early copy as a complex response."""
        phase = 2 * np.pi * f * COPY_LEAD_S - read(EARLY_COPY, f, axis=2)
        return gain_of(read(EARLY_COPY, f)) * np.exp(1j * phase)

    doubled = filtered(thinned, lambda f: 1 + copy(f))
    rounded = 0.73 * np.tanh(doubled / 0.91)  # the sharpest snaps are rounded off
    band_limit = signal.firwin(511, EDGE_HZ, window=("kaiser", 9), fs=SR)
    return signal.oaconvolve(rounded, band_limit[None], "same")


dry = scene()
out = record(dry)
bounce(out)
```